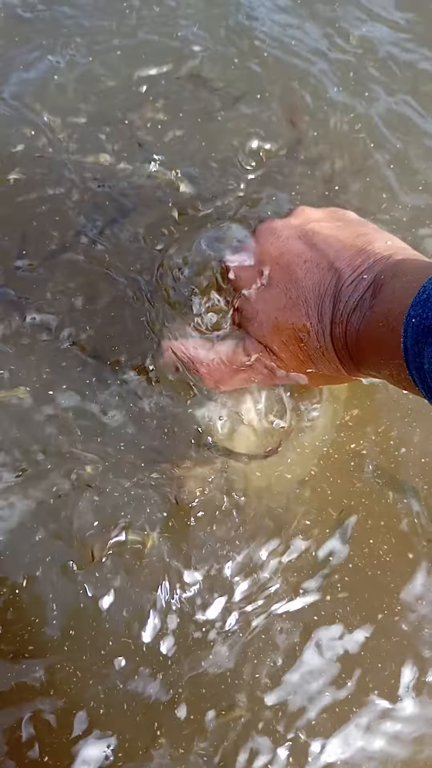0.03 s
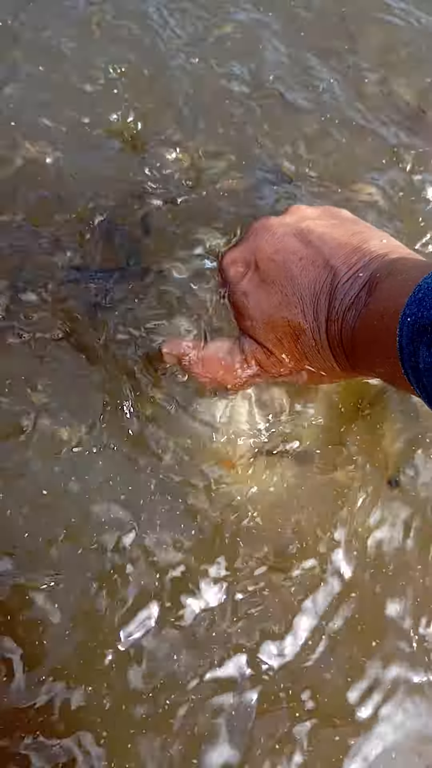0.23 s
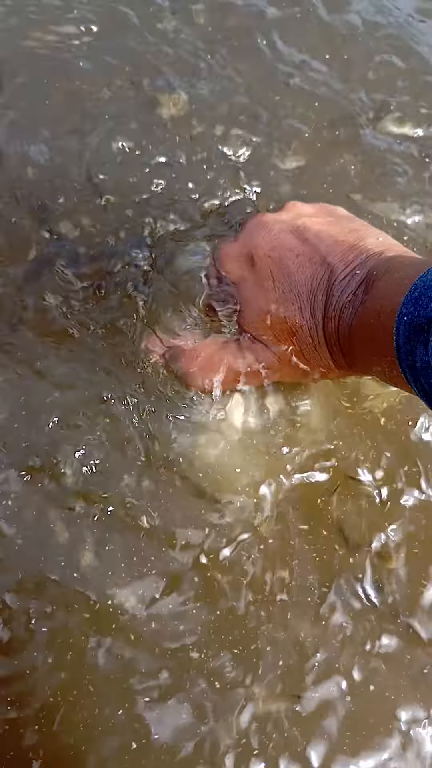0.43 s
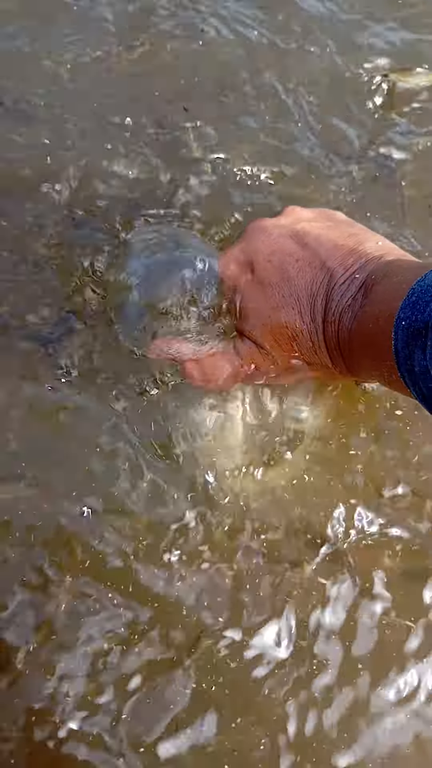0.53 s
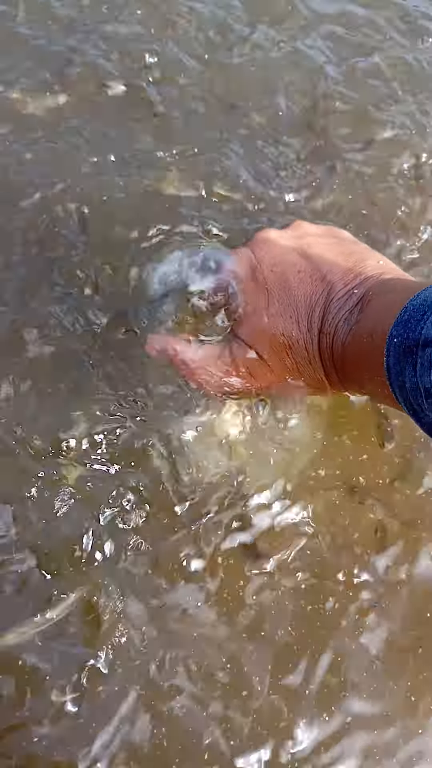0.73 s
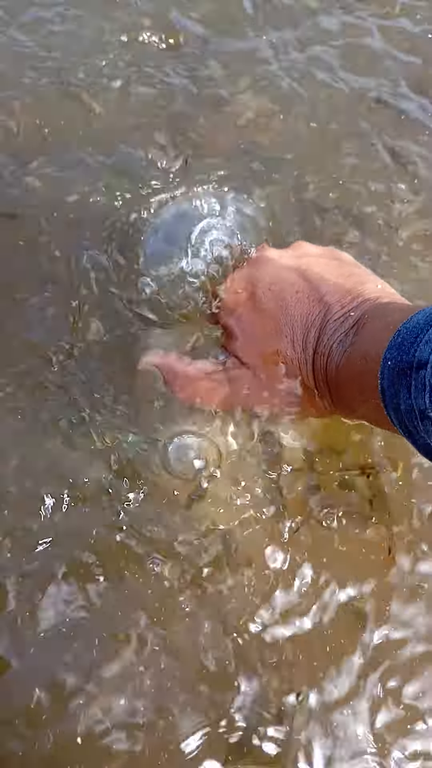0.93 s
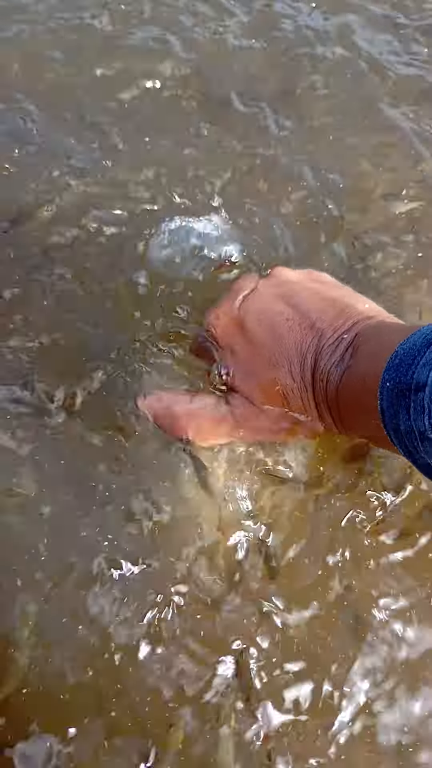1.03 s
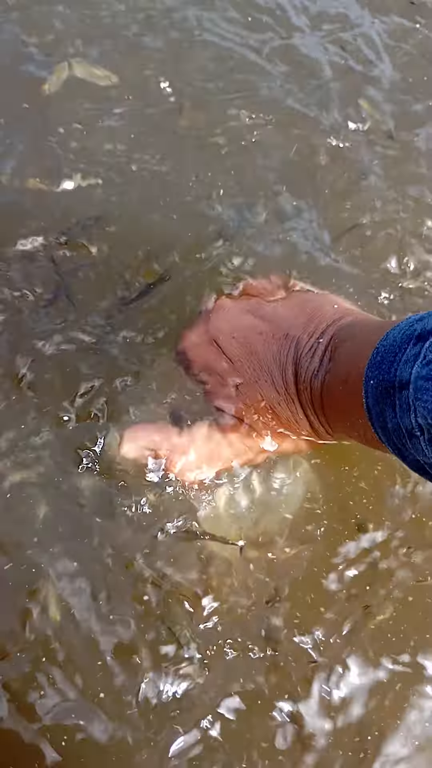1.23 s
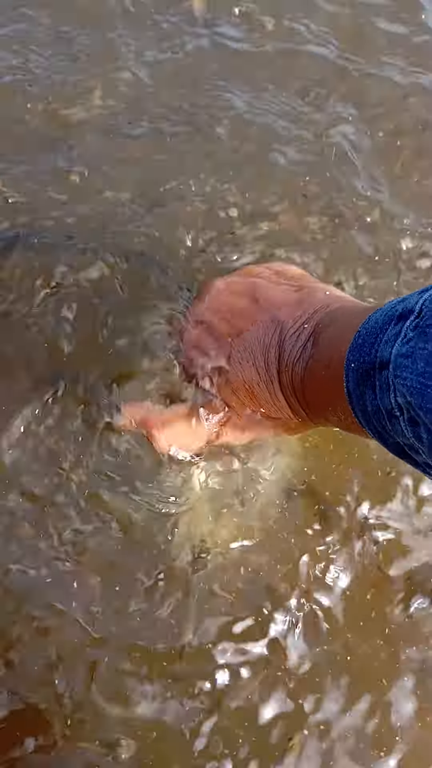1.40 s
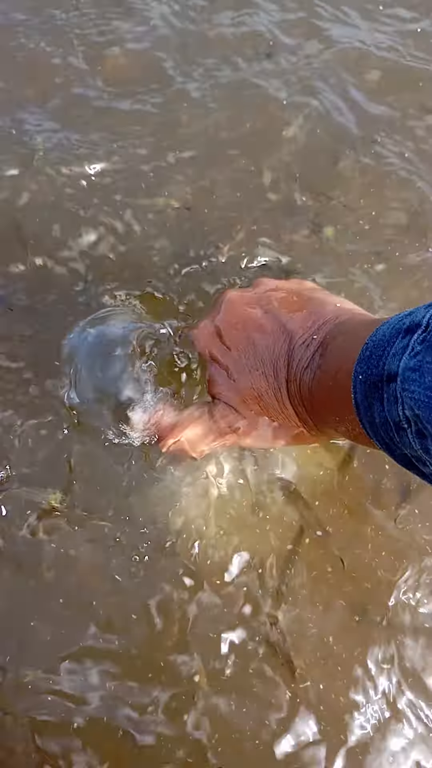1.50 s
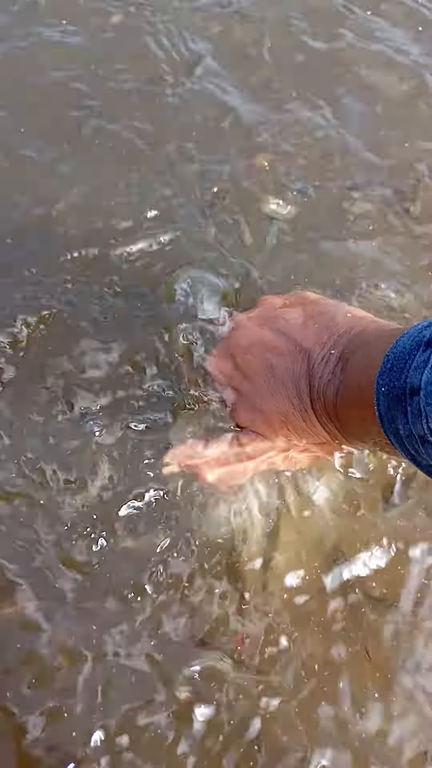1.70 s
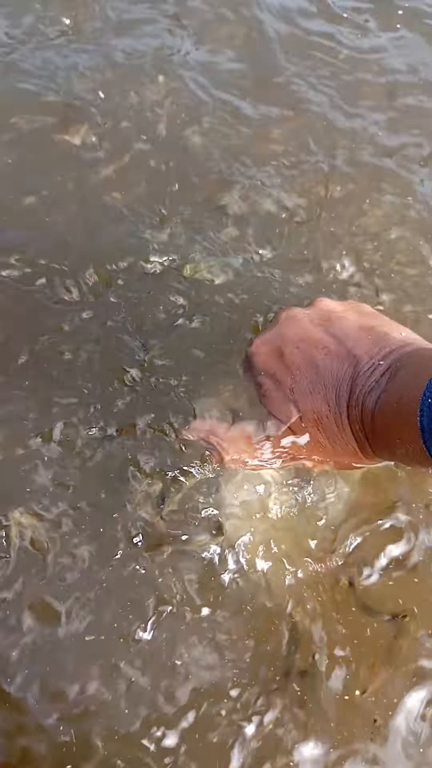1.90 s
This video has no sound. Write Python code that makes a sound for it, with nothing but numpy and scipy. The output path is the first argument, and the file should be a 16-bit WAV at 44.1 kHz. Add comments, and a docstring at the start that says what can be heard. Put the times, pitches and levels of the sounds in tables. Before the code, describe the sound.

A bottle fills under shallow water in uneven gulps, each a soft thump and a rising bubble note. Small bubbles plink and pop between them, with light sloshing and faint hissing ripples, close by in open air.

```python
"""Bottle filling under water

A bottle held under shallow water outdoors fills in gulps. Each gulp is a soft thump at the neck and
a big air bubble whose note climbs as it rises; smaller bubbles plink and burst at the surface.
The water sloshes round the hand and throws fine spray, and ripples hiss and fizz further off."""
import sys
import numpy as np
from scipy import signal
from scipy.fft import rfft, irfft
from scipy.io import wavfile

SR = 44100
rng = np.random.default_rng(int(sys.argv[2]) if len(sys.argv) > 2 else 0)


def dump(signal):
    """Clip the signal to [-1, 1] and save it as 16-bit WAV at the path in sys.argv[1]."""
    limited = np.clip(np.atleast_2d(signal).T, -1, 1)
    pcm = np.round(limited * 32767).astype(np.int16)
    wavfile.write(sys.argv[1], SR, pcm)


N = 85995
TIME = np.arange(N) / SR
CUTOFF_HZ = 16200
WOBBLE_DB, WOBBLE_HZ = 1.5, 110   # a bubble's changing shape shakes its level: depth and speed


def from_db(db):
    """Decibels to gain."""
    return 10 ** (np.asarray(db) / 20)


def rms_one(x):
    """Scale to an rms of 1."""
    return x / np.sqrt(np.mean(x ** 2) + 1e-20)


def in_time(rows):
    """A curve through rows of (seconds, value), at every sample."""
    return np.interp(TIME, *np.transpose(rows))


def since(start):
    """Seconds since a moment, zero before it."""
    return np.maximum(TIME - start, 0)


def fade(age, t60):
    """Exponential decay, 60 dB down after t60 seconds."""
    return np.exp(-np.log(1000) * age / t60)


def below(x, limit):
    """A gain of 1 that drops steeply as x passes a limit."""
    return 1 / (1 + (x / limit) ** 10)


def tone(hz, age):
    """A sine that starts with its event and follows a pitch curve."""
    return np.sin(2 * np.pi * np.cumsum(hz * np.minimum(age * SR, 1)) / SR)


def drift(hz):
    """Smooth random modulation, low-passed at hz; rms 1."""
    lowpass = signal.butter(2, hz, fs=SR, output="sos")
    return rms_one(signal.sosfilt(lowpass, rng.standard_normal(2 * N))[N:])


def coloured_noise(colour):
    """Noise shaped by an EQ curve, rolled off below its first point; rms 1."""
    hz, db = np.transpose(colour)
    bins = np.maximum(np.fft.rfftfreq(N, 1 / SR), 1)
    gain = from_db(np.interp(np.log(bins), np.log(hz), db)) * np.minimum(bins / hz[0], 1) ** 2
    return rms_one(irfft(rfft(rng.standard_normal(N)) * gain, N))


def bubble_cloud(per_s, low_hz, high_hz, cycles, spread_db, tilt_db, count=24):
    """Random bubbles ping resonators that die away in `cycles` periods; tilt is per octave; rms 1."""
    sizes = from_db(spread_db * np.minimum(rng.exponential(1, N), np.pi)) * rng.choice([-1, 1], N)
    born = rng.random(N) < per_s / SR
    resonator = rng.integers(0, count, N)
    out = 0
    for k, hz in enumerate(np.geomspace(low_hz, min(high_hz, CUTOFF_HZ), count)):
        r, w = fade(1 / SR, cycles / hz), 2 * np.pi * hz / SR
        kicks = sizes * born * (resonator == k) + 1e-18
        ring = signal.lfilter([0, np.sin(w)], [1, -2 * r * np.cos(w), r * r], kicks)
        out = out + from_db(tilt_db * np.log2(hz / low_hz)) * ring
    return rms_one(out)


def ripples():
    """Small waves hiss, shed tiny fizzing bubbles and flick droplets that tick on the surface."""
    # Fader for the whole ripple bed. Each row: time in seconds, gain in dB.
    fader = [(0.0, -64), (0.3, -61.5), (0.814, -60.5), (1.286, -62.5), (1.95, -60.5)]
    # Tone of the hiss. Each row: frequency in Hz, relative level in dB.
    colour = [(180, -15), (300, -2), (425, 0), (1080, 1.5), (1250, -1), (1660, -3), (1970, -3),
              (7200, -11.5), (9500, -20.5), (16000, -26)]
    fizz = bubble_cloud(per_s=410, low_hz=4000, high_hz=14900, cycles=40, spread_db=4.5, tilt_db=-4)
    drops = bubble_cloud(per_s=82, low_hz=5500, high_hz=14100, cycles=31, spread_db=-0.5, tilt_db=-7.5)
    hiss = coloured_noise(colour)
    return from_db(in_time(fader)) * (from_db(0.5) * hiss + from_db(-10) * fizz + from_db(-16) * drops)


def slosh():
    """Moved water rumbles, and dull bubbles churn round the hand."""
    # Fader for the rumble, ahead of its cap and trim. Each row: time in seconds, gain in dB.
    rumble_fader = [(0.0, -57.5), (0.102, -67.5), (0.238, -64), (0.266, -49), (0.418, -65), (0.488, -45.5),
                    (0.53, -60), (0.63, -70.5), (0.706, -47), (0.754, -71), (0.82, -59), (0.938, -64.5),
                    (1.21, -52), (1.314, -66), (1.352, -48), (1.44, -54), (1.5, -60.5), (1.6, -61),
                    (1.666, -45), (1.704, -72.5), (1.95, -63)]
    # Tone of the rumble. Each row: frequency in Hz, relative level in dB.
    colour = [(34, -51), (58, 0.5), (95, 8), (150, -1), (280, -1.5), (450, -20), (900, -23), (1800, -44.5)]
    # Swells of the churning. Each row: time in seconds, level in dB.
    churn_level = [(0, -67), (.2, -63), (.37, -55.5), (.6, -69.5), (.97, -60.5), (1.05, -53.5),
                   (1.13, -61.5), (1.18, -54), (1.28, -67), (1.38, -59), (1.58, -58), (1.8, -64.5),
                   (1.95, -64)]
    cap_db, trim_db = -43.5, -0.5
    rumble = from_db(np.minimum(in_time(rumble_fader), cap_db) + trim_db) * coloured_noise(colour)
    churn = bubble_cloud(per_s=350, low_hz=185, high_hz=635, cycles=6.4, spread_db=1, tilt_db=0.5)
    return rumble + from_db(in_time(churn_level)) * churn


def splashes():
    """Water folding over sheds a brief swell of tiny drops."""
    # Puffs of fine spray. Each row: time of the peak in seconds, centre pitch in Hz, level in dB,
    # half length in seconds, drops per second.
    puffs = [(0.161, 3300, -64, 0.021, 8000), (0.311, 7300, -56, 0.015, 950),
             (0.638, 3080, -56.5, 0.014, 1900), (0.808, 2140, -55, 0.0077, 1200),
             (0.883, 9500, -67, 0.035, 320), (1.086, 4000, -58.5, 0.0062, 3600),
             (1.177, 674, -52.5, 0.021, 2700), (1.352, 1170, -59.5, 0.03, 1260),
             (1.616, 3400, -57.5, 0.033, 2500), (1.905, 5400, -55.5, 0.038, 10700)]
    width = 1.57   # the band reaches this factor either side of its centre
    out = 0
    for peak, hz, db, half_length, per_s in puffs:
        swell = np.exp(-((TIME - peak) / half_length) ** 2)
        spray = bubble_cloud(per_s, hz / width, hz * width, 7.1, spread_db=4.5, tilt_db=3, count=10)
        out = out + from_db(db) * swell * spray
    return out


def pops():
    """Bubble skins burst on the surface: a sharp tick, trailed by a trace of spray."""
    # Bursting bubbles. Each row: start in seconds, centre pitch in Hz, peak level in dB.
    bursts = [(0.1812, 3160, -34), (0.3084, 8000, -48.5), (0.3333, 4660, -38), (0.4653, 6350, -35),
              (0.514, 4470, -36.5), (0.6041, 5200, -40), (0.7028, 2350, -45), (0.765, 6300, -41.5),
              (0.786, 2070, -40.5), (0.797, 5700, -36.5), (0.8542, 9500, -44.5), (0.8904, 1470, -33.5),
              (0.8911, 4800, -38.5), (.9015, 9900, -41.5), (1.09, 3760, -44), (1.3799, 7850, -42),
              (1.383, 1680, -44), (1.506, 1890, -42), (1.585, 5100, -40), (1.736, 3000, -45),
              (1.7903, 3250, -43), (1.8281, 4840, -37.5), (1.843, 12000, -42.5)]
    spray_gain, spray_t60_s = 0.19, 0.018
    width = 1.52   # the band reaches this factor either side of its centre
    out = 0
    for start, hz, db in bursts:
        age = since(start)
        begun = (age > 0) * 1.0
        click = np.diff(begun, prepend=0)
        spray = spray_gain * rng.standard_normal(N) * begun * fade(age, spray_t60_s)
        band = signal.butter(2, [hz / width, min(hz * width, CUTOFF_HZ)], "band", fs=SR, output="sos")
        tick = signal.sosfilt(band, click + spray + 1e-18)
        out = out + from_db(db) * tick / np.abs(tick).max()
    return out


def plinks():
    """Small bubbles pinch off, ring, and chirp upwards on reaching the surface."""
    # Ringing bubbles. Each row: start in seconds, base pitch in Hz, level in dB,
    # 60 dB decay time in seconds, seconds until the pitch has doubled.
    bubbles = [(.1818, 5600, -40, 0.012, 0.032), (0.21, 999, -30.5, 0.051, 0.066),
               (0.2109, 2340, -36, 0.023, 0.056), (0.2479, 1150, -22.5, 0.054, 0.055),
               (.3040, 2357, -19, 0.015, 0.022), (0.3493, 2436, -34, 0.037, 0.021),
               (0.3522, 4060, -37, 0.019, 0.033), (.356, 1025, -36.5, 0.049, 0.022),
               (0.4054, 2600, -43, 0.019, 0.035), (0.4416, 5950, -39.5, 0.013, .04),
               (0.4651, 3990, -27, 0.012, 0.045), (0.6039, 4300, -24, 0.0049, .04),
               (.797, 3220, -36.5, 0.0068, .04), (.8065, 2170, -36, 0.0084, .04),
               (.8541, 2273, -31.5, 0.024, 0.094), (0.889, 1123, -24, 0.1, 0.051),
               (0.9894, 4390, -40.5, 0.017, .04), (1.002, 220, -41.5, 0.14, 0.14),
               (1.041, 275, -38.5, 0.11, 0.15), (1.07, 264, -38, .07, .1), (1.1606, 310.5, -36, 0.12, 0.18),
               (1.161, 610, -48, 0.13, 0.16), (1.162, 1210, -46, 0.033, .08),
               (0.552, 6320, -50.5, 0.034, .04), (1.2345, 5540, -39.5, 0.01, .04),
               (1.5575, 5500, -41, 0.011, 0.043), (1.584, 7780, -44, 0.0077, .04),
               (1.6104, 3370, -26, 0.0039, .04), (1.6212, 2244, -32.5, 0.027, 0.029),
               (1.707, 1305, -41, 0.05, 0.078), (1.8275, 6770, -34, 0.011, 0.044)]
    attack_cycles, sharp_share, settle_s = 0.95, 0.16, 0.00076
    chirp_power, break_share = 3.1, 1.05   # the bubble breaks once its pitch has risen by this share
    out = 0
    for start, hz, db, t60, doubling in bubbles:
        age = since(start)
        settle = sharp_share * np.exp(-age / settle_s)
        chirp = np.minimum((age / doubling) ** chirp_power, 2)
        attack = (1 - np.exp(-age * hz / attack_cycles)) ** 2
        envelope = attack * fade(age, t60) * below(chirp, break_share)
        wobble = WOBBLE_DB * drift(WOBBLE_HZ) * np.minimum(age * WOBBLE_HZ, 1)   # eases in
        out = out + from_db(db + wobble) * envelope * tone(hz * (1 + settle + chirp), age)
    return out


def thumps():
    """Water pushes into the neck in one heavily damped swing: a soft, dull knock."""
    # Inrushes of water. Each row: start in seconds, pitch in Hz, level in dB, periods up to the peak.
    inrushes = [(0.013, 121, -40, 0.34), (0.2667, 270, -35.5, 0.87), (0.2991, 617, -29, 0.9),
                (0.4605, 184, -35, 0.47), (0.4768, 200, -34, 0.5), (0.4831, 165, -34.5, .5),
                (0.4946, 187, -37, 0.19), (0.6804, 198, -36, 0.35), (0.6996, 264, -29.5, 0.35),
                (0.8629, 149, -34, 0.22), (0.8708, 95, -34.5, 0.71), (0.8841, 311, -21, 0.57),
                (1.1688, 270, -33, 0.6), (1.2127, 139, -45, 0.56), (1.357, 181, -39.5, .9),
                (1.4478, 222, -32, 0.47), (1.636, 252, -31.5, 0.21), (1.6624, 264, -24.5, 0.67)]
    out = 0
    for start, hz, db, cycles in inrushes:
        age = since(start)
        rise = age * hz / cycles   # 1 at the envelope's peak
        envelope = (rise * np.exp(1 - rise)) ** 2
        out = out + from_db(db) * envelope * tone(hz, age)
    return out


def glugs():
    """Big bubbles swell, hold and die away, their note climbing as they near the surface."""
    # Air leaving the neck. Each row: start in seconds, starting pitch in Hz, level in dB,
    # then, all in seconds, attack time, wait from the start until the decay, 60 dB decay time.
    bubbles = [(0.278, 334.8, -39.5, 0.019, 0.072, 0.11), (0.497, 464, -38, 0.0045, .011, 0.097),
               (0.7016, 353, -32.5, 0.002, 0.05, 0.08), (0.8886, 328, -42, 0.0027, 0.038, 0.038),
               (1.459, 327.4, -40, 0.012, 0.038, 0.15), (1.6637, 266.4, -33.5, 0.0065, 0.0036, 0.15)]
    octaves_per_s, ceiling_hz, fade_out_hz = 27.46, 1287, 1150
    waver_share = 0.025   # the changing shape shakes the pitch too
    out = 0
    for start, hz, db, attack, hold, t60 in bubbles:
        age = since(start)
        climb = hz * 2 ** np.minimum(octaves_per_s * age, np.e)
        pitch = climb / (1 + (climb / ceiling_hz) ** 6) ** (1 / 6)   # levels off softly
        envelope = np.minimum(age / attack, 1) * fade(since(start + hold), t60)
        gain = from_db(db + WOBBLE_DB * drift(WOBBLE_HZ)) * below(pitch, fade_out_hz)
        waver = 1 + waver_share * drift(WOBBLE_HZ)
        out = out + gain * envelope * tone(pitch * waver, age)
    return out


def scene():
    """A dry mono mix: open air, no echo."""
    return (glugs() + thumps() + plinks() + pops() + splashes() + slosh() + ripples())[None]


def record(dry):
    """The microphone loses the deepest bass; the very top is cut steeply."""
    low_cut = signal.butter(6, 41, "high", fs=SR, output="sos")
    high_cut = signal.ellip(10, .1, 70, CUTOFF_HZ, fs=SR, output="sos")
    return signal.sosfilt(high_cut, signal.sosfilt(low_cut, dry))


dry = scene()
out = record(dry)
dump(out)
```